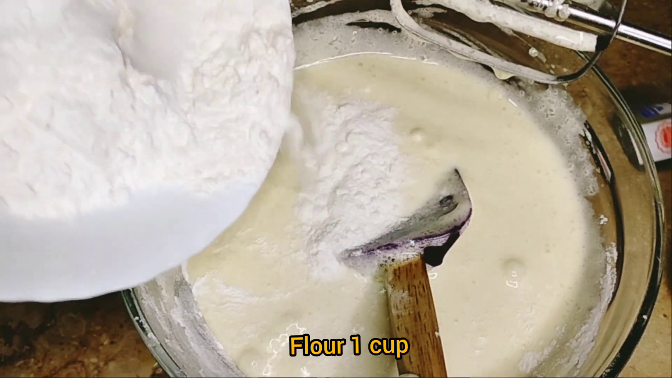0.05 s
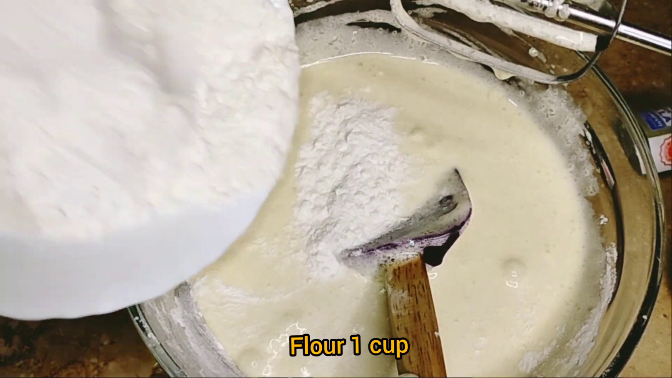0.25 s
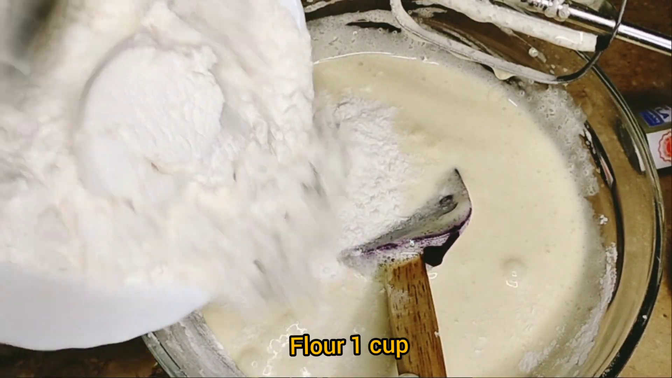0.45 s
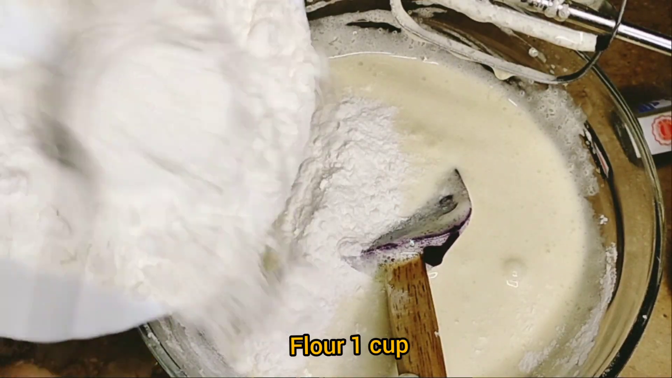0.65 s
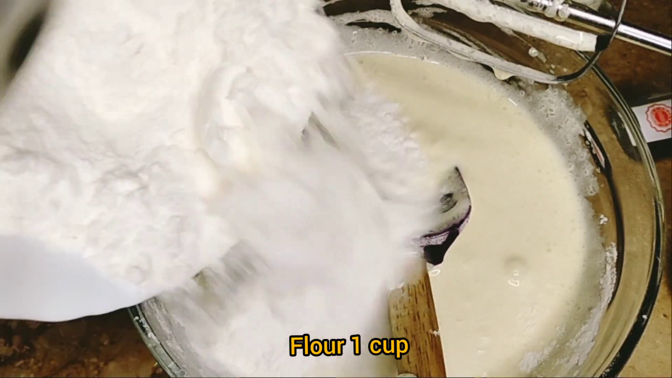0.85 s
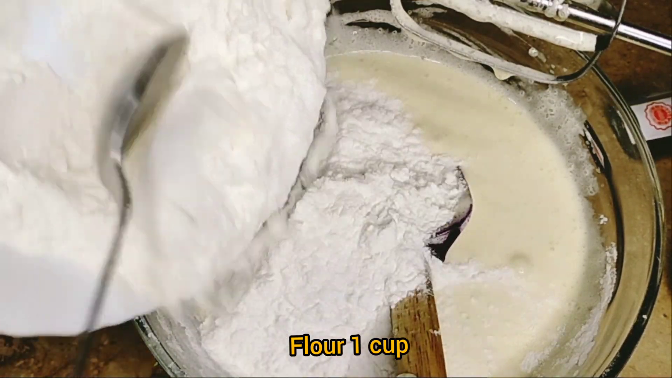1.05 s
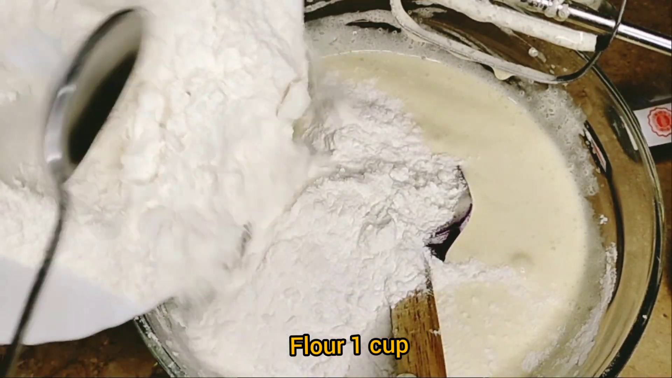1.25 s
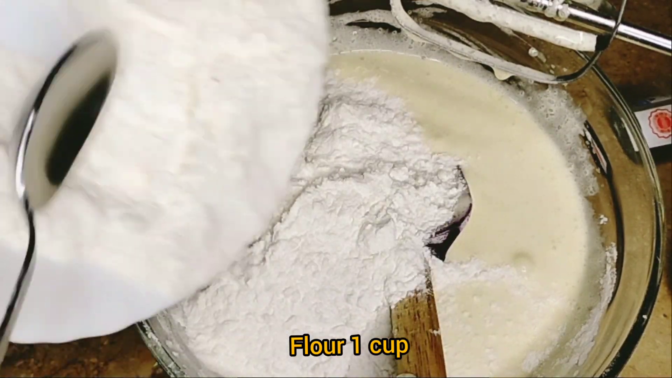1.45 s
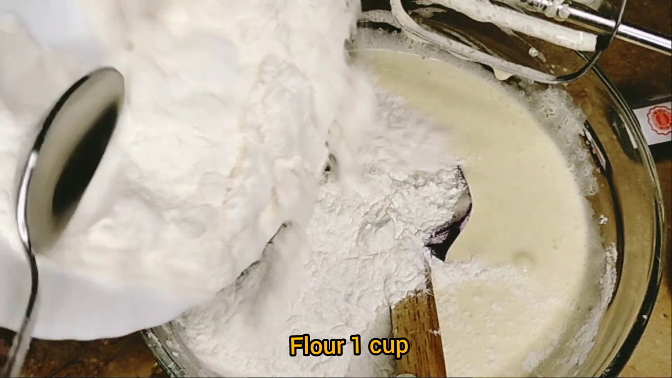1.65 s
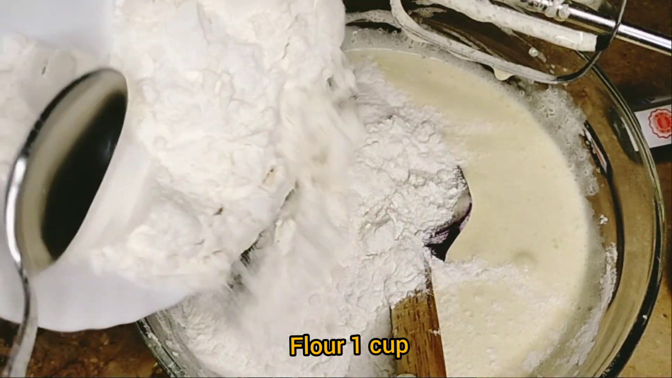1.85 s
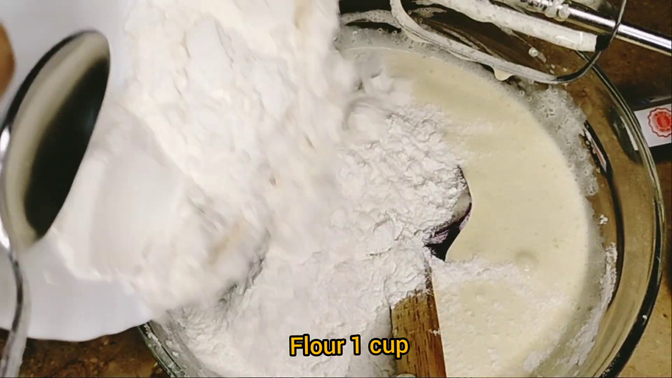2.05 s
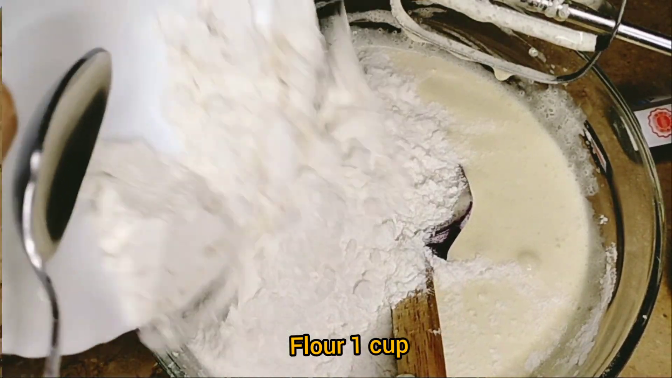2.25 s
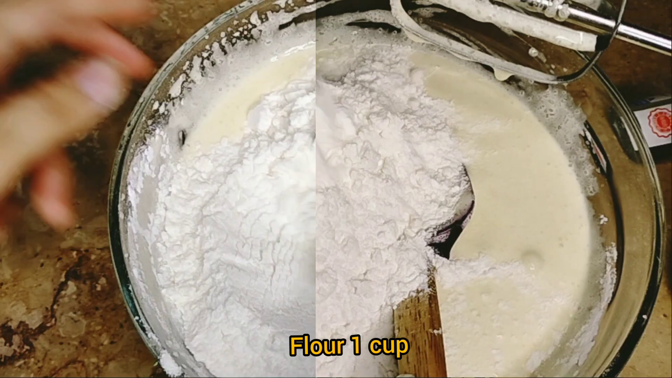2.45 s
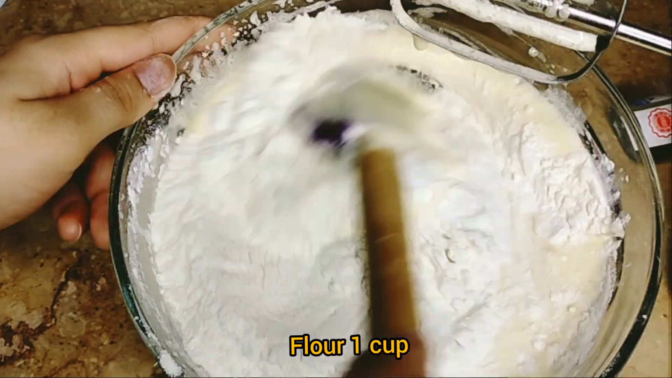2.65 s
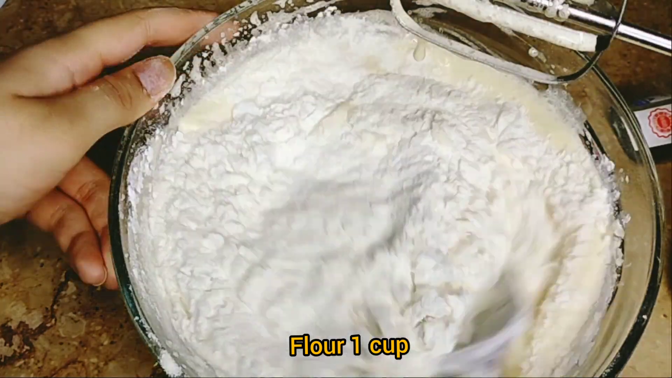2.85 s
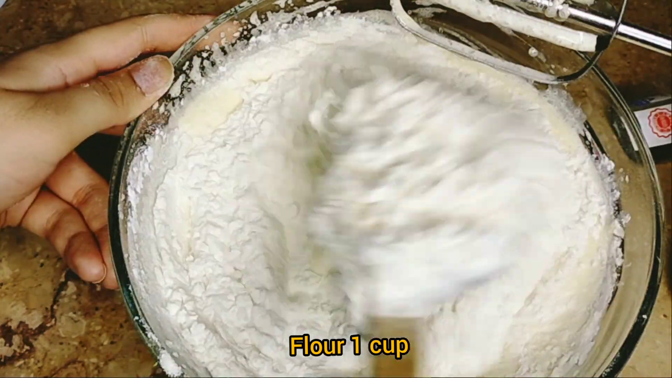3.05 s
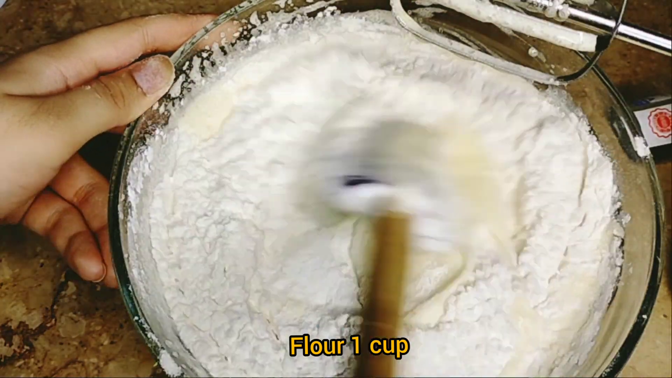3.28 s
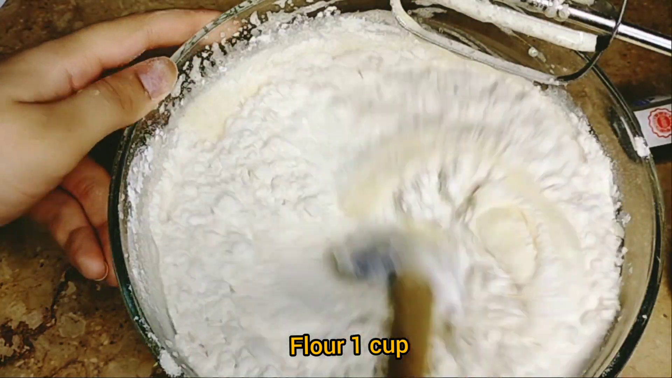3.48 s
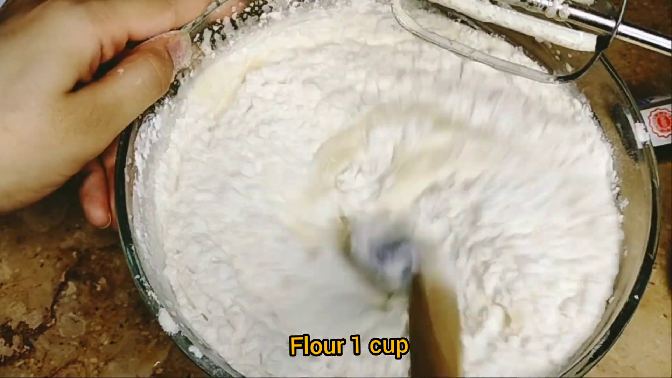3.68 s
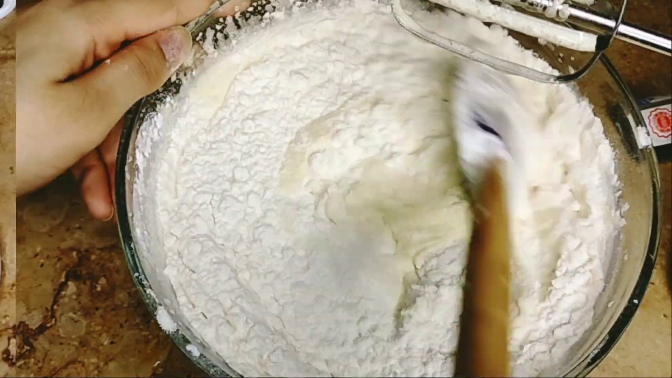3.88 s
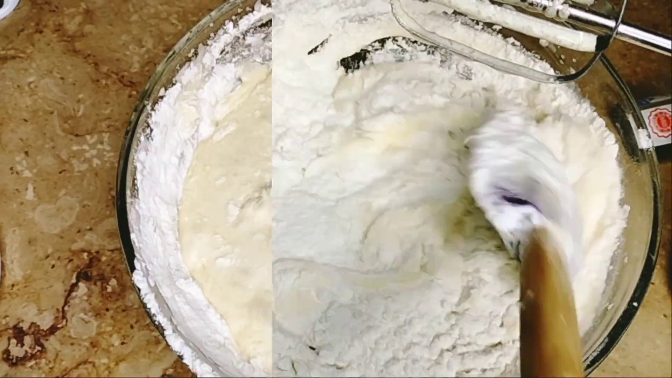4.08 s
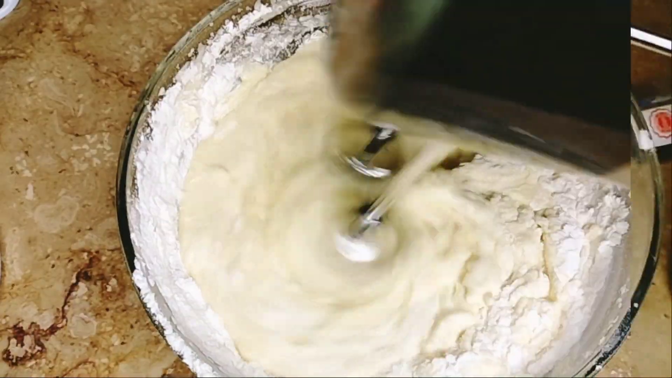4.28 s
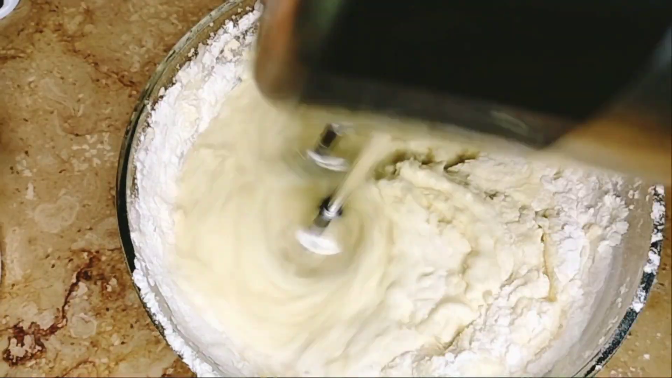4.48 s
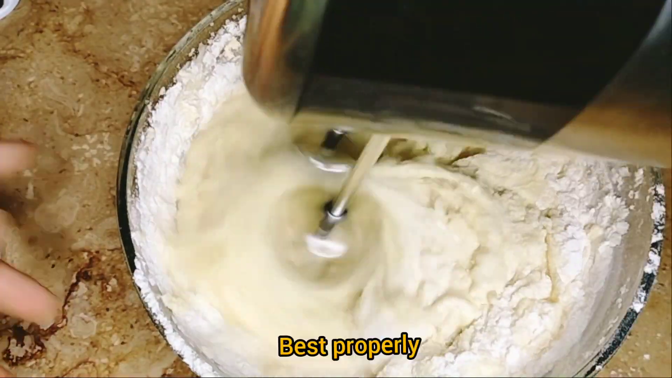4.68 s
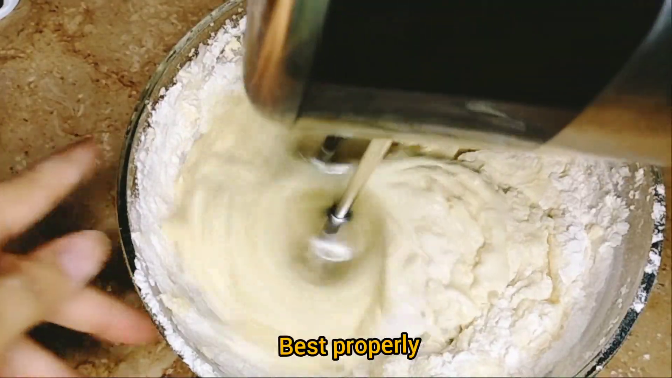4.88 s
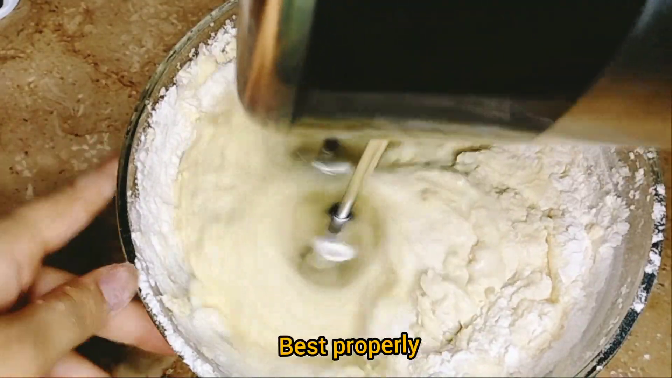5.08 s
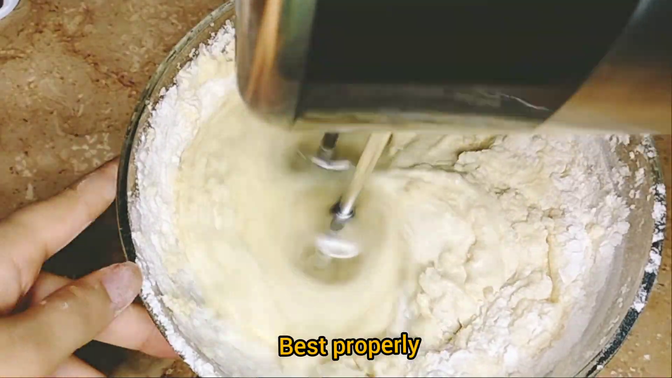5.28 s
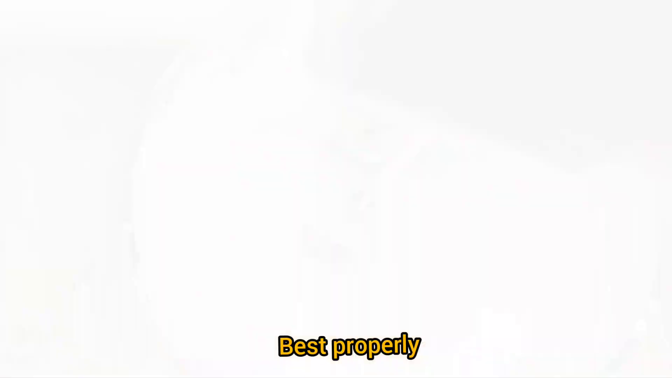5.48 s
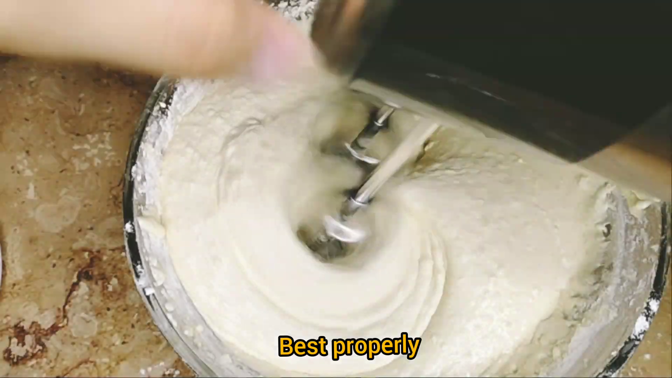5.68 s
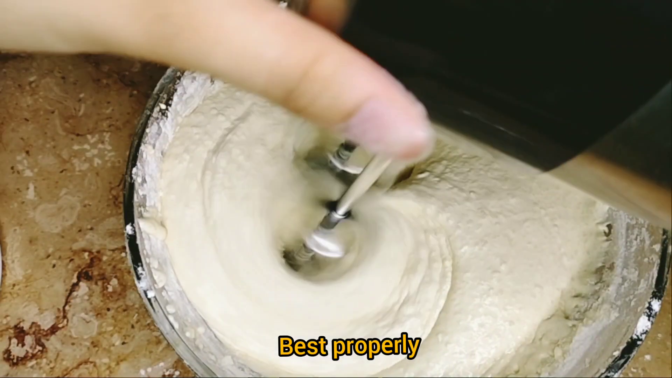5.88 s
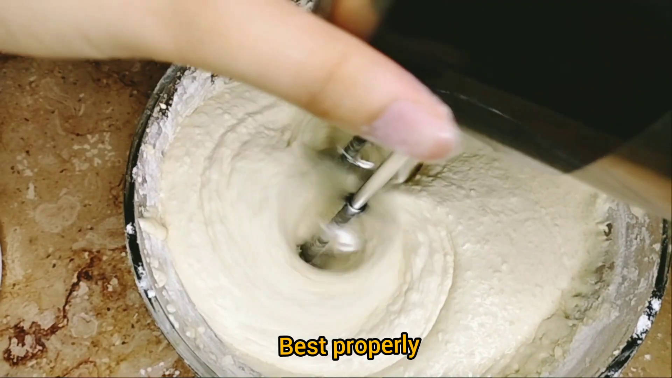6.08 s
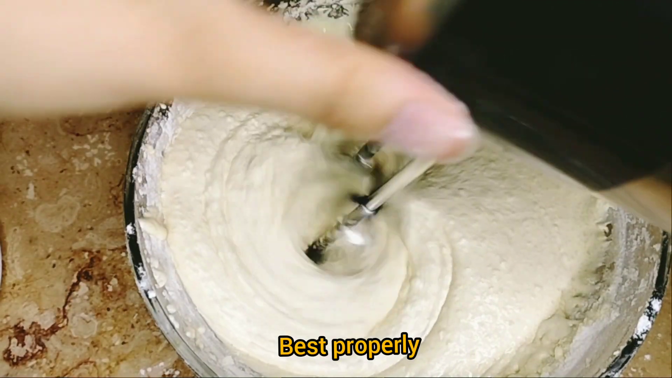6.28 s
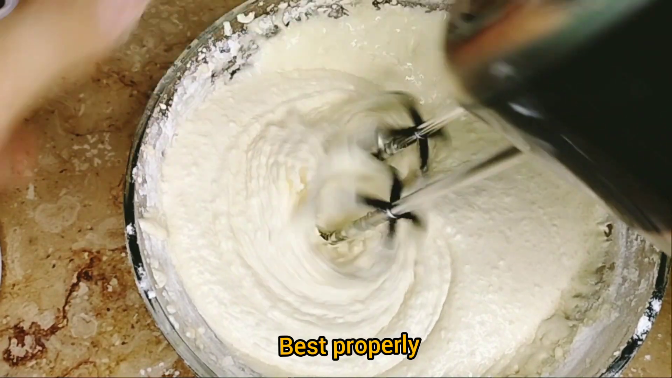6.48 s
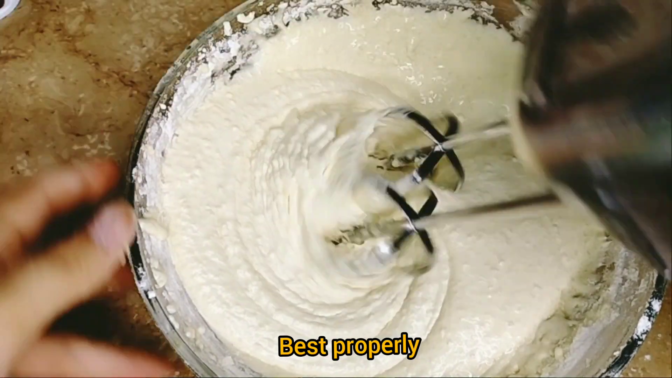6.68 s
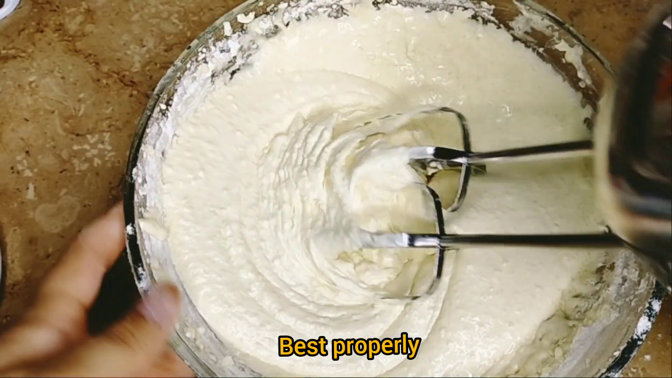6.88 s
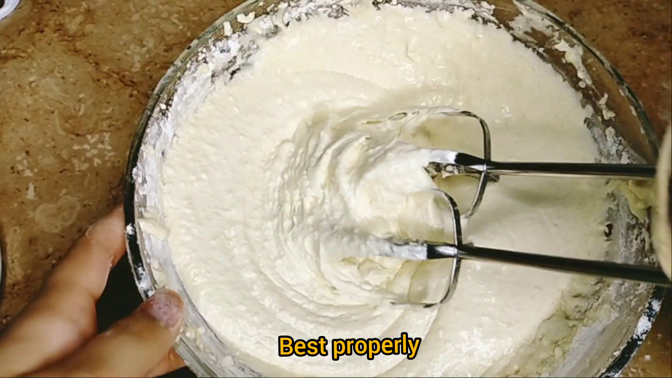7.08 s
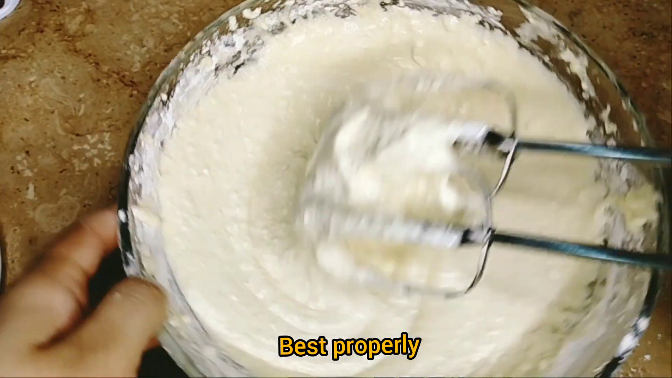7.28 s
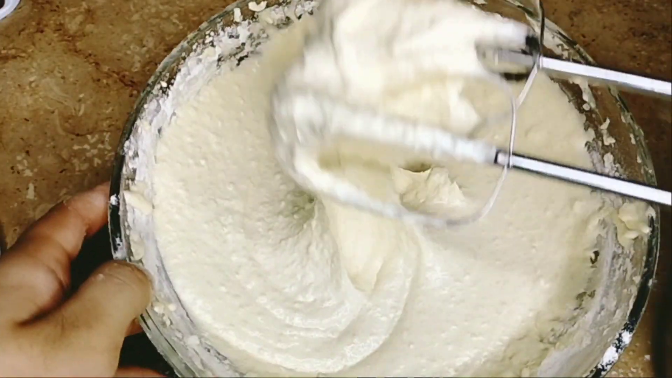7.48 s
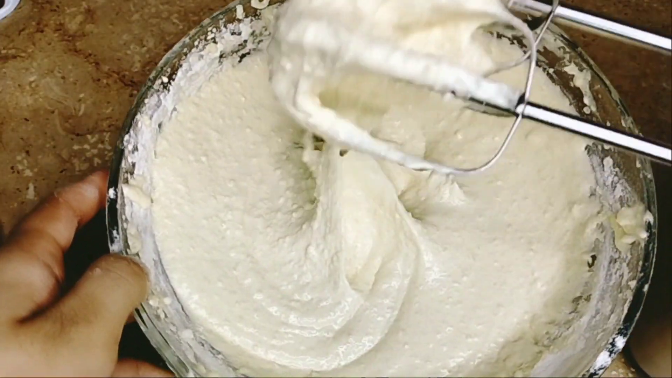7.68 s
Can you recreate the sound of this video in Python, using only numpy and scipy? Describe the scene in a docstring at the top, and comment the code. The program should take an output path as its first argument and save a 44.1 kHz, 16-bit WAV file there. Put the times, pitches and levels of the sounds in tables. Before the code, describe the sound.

Right at the start, a dish hits the rim of a glass bowl with a bright, ringing double clank. A spoon taps lightly at about 0.5, 0.9, 1.3 and 2.1 seconds, among very faint swishes of flour. Dull knocks come near 1.9 and 2.8 seconds, with barely audible squelches of stirred batter. At 3.8 seconds an electric hand mixer starts, whining quickly upward into a loud, buzzing, rattling whir. From about 4.6 seconds its beaters click irregularly against the glass. The whole sound fades to silence for an instant at 5.5 seconds and returns as the motor switches off, falling in pitch until it stops around 6.8 seconds. At 7 seconds the mixer bumps the bowl with a low ring. A soft knock and quiet wet squelches follow until about 7.7 seconds as the beaters pull out. Everything sounds close, in a small, quiet kitchen with slight reverberation.

```python
"""A small kitchen: flour is spooned from a dish into a glass bowl of batter and stirred in.
Dish and spoon clink and ring, the flour swishes, the batter squelches. An electric hand mixer runs up:
its gears rattle, its rotor slots whine, its beaters strike the glass. The sound fades out and back in.
The motor is switched off and coasts down, the mixer bumps the bowl, the beaters pull out of the batter."""
import sys
import numpy as np
from scipy import signal
from scipy.fft import rfft, irfft
from scipy.io import wavfile

SR = 44100
rng = np.random.default_rng(int(sys.argv[2]) if len(sys.argv) > 2 else 0)


def master_out(mix):
    """Clip the mix to full scale and print it as 16-bit PCM to the path in sys.argv[1]."""
    frames = np.transpose(np.atleast_2d(mix))
    ceiling = np.clip(frames, -1, 1)
    pcm = np.round(ceiling * 32767).astype(np.int16)
    wavfile.write(sys.argv[1], SR, pcm)


N = 340893
TIME = np.arange(N) / SR

POWER_ON_S, POWER_OFF_S = 3.8, 5.69
FADE_AT_S, FADE_SLOPE_S = 5.503, .29
TOP_SPEED_HZ, SURGE_HZ = 290.3, 99.5   # rotor turns, mains half waves
GEAR_DB, GEAR_DB_PER_OCTAVE = -27.5, 10

# Batter load on the beaters. Each row: time in seconds, gain in dB.
BATTER_LOAD = [(3.82, -11), (3.95, -9), (4.12, -5.5), (4.64, 1), (5.2, 0), (5.62, -3), (6.13, -4),
               (6.5, 0.5)]


def mixer(speed_hz, room):
    """Rotor speed sets the rotor tones; speed and load set the level of rattle, hum and fan hiss."""
    # Each row: multiple of the turn rate, level in dB against the rattle at full speed.
    rotor_orders = [(2, -14.5), (3, -11.5), (4, -14.5), (5, -14), (6, -19.5), (7, -36), (8, -18), (9, -20),
                    (10, -19.5), (13, -42.5)]
    # Each row: frequency in Hz, relative level in dB.
    fan_spectrum = [(2650, -15), (4500, -1), (5400, -9.5), (6500, -11.5), (7650, -9), (8320, -0.5),
                    (8960, -3), (9740, -11.5), (12000, -20.5), (15800, -15)]
    # Each row: frequency in Hz, level in dB at half speed.
    stator_tones = [(100, -62.5), (200, -58.5)]
    angle_rad = 2 * np.pi * np.cumsum(speed_hz) / SR + 0.016 * drift(21)
    powered = during(POWER_ON_S, POWER_OFF_S)
    speed_share = speed_hz / speed_hz.max()
    gear_gain = from_db(driven_db(speed_hz, GEAR_DB, GEAR_DB_PER_OCTAVE))
    gears = gear_gain * gear_rattle(angle_rad, mesh_depth=0.11, rough_db=1.5, ring_db=4.0)
    rotor = sum(from_db(db + 2.3 * drift(6)) * np.sqrt(2) * np.sin(k * angle_rad + 0.62 * drift(6.6))
                for k, db in rotor_orders)
    rotor *= gear_gain * speed_share ** 2   # unbalance
    rotor *= 1 + 0.92 * powered * np.cos(2 * np.pi * SURGE_HZ * TIME)   # torque surges with the mains
    hum = from_db(driven_db(speed_hz, top_db=-30, db_per_octave=28)) * np.sin(angle_rad)
    fan_db = driven_db(speed_hz, top_db=-44, db_per_octave=9) + 2.0 * drift(60)
    fan = from_db(fan_db) * noise(fan_spectrum)
    stator = sum(from_db(db + 25 * (speed_share - 0.5) + 5.1 * drift(14)) * np.sin(2 * np.pi * hz * TIME)
                 for hz, db in stator_tones)
    whine = motor_whine(speed_hz, angle_rad, powered, room)
    return (gears + rotor + hum + whine + fan + powered * stator) * during(POWER_ON_S, 6.9)


def motor_speed_hz():
    """Run-up; after the fade a slower, slightly sagging run; then coasting against drag and friction."""
    kick_hz, run_up_s = 43, .284
    switch_off_hz, sag_hz_per_s = 244, 85
    drag_s, friction_hz_per_s = 1.2, 126
    since_on_s, since_off_s = np.maximum(TIME - POWER_ON_S, 0), TIME - POWER_OFF_S
    run_up = TOP_SPEED_HZ - (TOP_SPEED_HZ - kick_hz) * np.exp(-since_on_s / run_up_s)
    slower_run = switch_off_hz - sag_hz_per_s * since_off_s
    brake_hz = friction_hz_per_s * drag_s
    coast = (switch_off_hz + brake_hz) * np.exp(-since_off_s / drag_s) - brake_hz
    return np.maximum(np.select([TIME < FADE_AT_S, since_off_s < 0], [run_up, slower_run], coast), 1)


def driven_db(speed_hz, top_db, db_per_octave):
    """A mixer layer grows louder with speed and load."""
    return top_db + db_per_octave * np.log2(speed_hz / TOP_SPEED_HZ) + in_time(BATTER_LOAD)


def gear_rattle(angle_rad, mesh_depth, rough_db, ring_db):
    """Gear teeth clatter unevenly, swelling once a turn, and ring the shell."""
    # Each row: frequency in Hz, relative level in dB.
    gear_spectrum = [(35, -69), (60, -50.5), (97, -18), (250, -8), (286, -12), (321, -4.5), (519, -8),
                     (561, -4.5), (874, -3), (1680, -8), (1890, -9), (3120, -18), (3430, -18),
                     (3930, -19.5), (6000, -52.5), (7800, -64.5), (13200, -120)]
    # Each row: frequency in Hz, width in Hz, gain in dB.
    shell_modes = [(167.7, 33.5, -8), (909, 63, -5), (947, 11, 4), (1500, 38, 2), (1660, 89, 3),
                   (2670, 190, -5.5)]
    teeth = rng.standard_normal(N) * (1 + mesh_depth * np.cos(angle_rad)) * from_db(rough_db * drift(70))
    clatter = colour(teeth, gear_spectrum)
    shell = sum(from_db(db) * resonance(clatter, hz, width) for hz, width, db in shell_modes)
    return unit_rms(clatter + from_db(ring_db) * shell)


def motor_whine(speed_hz, angle_rad, powered, room):
    """Twelve rotor slots pass the poles; their tone sweeps the housing modes. Brushes and room add in."""
    # Each row: frequency in Hz, width in Hz, gain in dB.
    housing_modes = [(950, 270, -41.5), (1523, 320, -29), (2856, 266, -14), (3506, 250, -23.5)]
    inrush_end_hz, no_load_hz, slower_whine_db = 275, 334.4, -11.5
    slot_rad = 12 * angle_rad
    # Starting current adds overtones and sparks, which ring the casing.
    inrush = powered * np.clip(1 - speed_hz / inrush_end_hz, 0, 1)
    overtones = sum(surging_tone(k * slot_rad, wobble_rad=.5) * (2 / k) ** 4 for k in range(2, 6))
    sparks = from_db(16.5) * rng.standard_normal(N)
    casing = resonance(from_db(14) * overtones + sparks, hz=2690, width_hz=64)
    current = powered * np.clip(1 - speed_hz / no_load_hz, 0, 1)
    pull = current * from_db(slower_whine_db * (TIME > FADE_AT_S)) * surging_tone(slot_rad, wobble_rad=.2)
    whine = sum(from_db(db) * resonance(pull, hz, width) for hz, width, db in housing_modes)
    whine += from_db(-50.5) * inrush * (overtones + casing)
    whine += brushes(speed_hz, angle_rad, powered)
    return from_db(-1) * whine + from_db(-9) * signal.fftconvolve(whine, room)[:N]


def brushes(speed_hz, angle_rad, powered):
    """Worn brushes buzz under power; coasting, they give one uneven tone of the commutator bars."""
    # Each row: multiple of the turn rate, relative level in dB.
    brush_orders = [(21, -5), (23, -1), (24, -3), (25, -5)]
    # Each row: frequency in Hz, gain in dB.
    shell_radiation = [(900, -76), (1500, -56), (2500, -54), (3300, -56), (4000, -63), (5200, -60),
                       (6900, -57)]
    bars = 24
    buzz = sum(from_db(db) * surging_tone(k * angle_rad, wobble_rad=.2) for k, db in brush_orders)
    buzz *= (speed_hz / speed_hz.max()) ** 2
    coasting = from_db(1 + 5 * drift(14)) * np.sin(bars * angle_rad + .25 * drift(90))
    return from_db(at_hz(shell_radiation, bars * speed_hz)) * (powered * buzz + (1 - powered) * coasting)


def surging_tone(phase_rad, wobble_rad):
    """The pull surges with each mains half wave, splitting a motor tone into a cluster of lines."""
    # Each row: offset in multiples of the surge rate, relative level in dB.
    sidebands = [(-1, -9), (0, 0), (1, 0), (2, -10)]
    surge_rad = 2 * np.pi * SURGE_HZ * TIME
    phase_rad = phase_rad + wobble_rad * drift(40)
    return unit_rms(sum(from_db(db) * np.sin(phase_rad + step * surge_rad) for step, db in sidebands))


def beaters(speed_hz, room):
    """Wires strike the glass; random light grazes come oftener and harder with speed and load."""
    # Each row: start in seconds, relative level in dB.
    hard_strikes = [(4.597, -19.5), (4.615, -21.5), (4.859, -16.5), (5.214, -18.5), (5.325, -16.5),
                    (5.669, -20.5), (5.755, -23), (5.973, -21), (6.038, -29.5), (6.116, -22.5)]
    # Each row: frequency in Hz, relative level in dB.
    spectrum = [(50, -35.5), (110, -2), (165, 11), (250, 4), (500, 2.5), (900, 4.5), (1400, 12), (1800, -4),
                (2800, -50.5), (4200, -30.5), (6800, -30.5), (8600, -39), (11000, -66.5), (15000, -43)]
    # Wires and full bowl. Each row: frequency in Hz, relative level in dB, T60 in seconds.
    modes = [(169, -13, 0.14), (1030, -2.5, 0.072), (1407, 4, 0.035)]
    grazes_per_s, room_db = 9, -5
    running = (TIME > POWER_ON_S) * (speed_hz > 1)
    effort = np.sqrt(speed_hz / TOP_SPEED_HZ) * from_db(in_time(BATTER_LOAD)) ** 2 * running
    graze_db = driven_db(speed_hz, GEAR_DB, GEAR_DB_PER_OCTAVE) + rng.normal(3, 3, N)
    grazes = [(TIME[i], graze_db[i]) for i in np.flatnonzero(rng.random(N) < grazes_per_s * effort / SR)]
    hits = [(s, db, 0, 0, room_db) for s, db in [*hard_strikes, *grazes]]
    return blows(hits, spectrum, room, gain_db=16.5, chatter_s=.003, chatter_db=0.5,
                 modes=modes, ring_db=-24)


def dish_clanks(room):
    """The dish hits the bowl's rim and rings."""
    # Each row: start in seconds, then relative level, bass, treble and room send in dB.
    hits = [(0.0915, -10, 2, -4, -6), (0.1935, -22.5, 3, -27, -5), (0.232, -40, -4, 18, -6),
            (0.421, -48, -11, 0, -15)]
    # Each row: frequency in Hz, relative level in dB.
    spectrum = [(47, -38), (80, -26), (154, -5), (229, -16.5), (347, -12.5), (413, -13), (1110, 2.5),
                (1290, -8.5), (1640, 5), (2380, -7.5), (2600, -4.5), (3610, -19.5), (4030, -2), (4500, -27),
                (15000, -56)]
    # Each row: frequency in Hz, relative level in dB, T60 in seconds.
    rim_modes = [(157, -9, 0.15), (959, -17, 0.48), (1600, -15, .4), (1914, -6.5, 0.41),
                 (2530, -15.5, 0.89), (4030, -4, 0.51), (4005, 11.5, 0.038), (8520, -14.5, 0.094)]
    return blows(hits, spectrum, room, gain_db=13.5, chatter_s=0.012, chatter_db=3.0,
                 modes=rim_modes, ring_db=-36)


def mixer_bump(room):
    """The mixer bumps the bowl, which rings low."""
    # Each row: start in seconds, then relative level, bass, treble and room send in dB.
    hits = [(6.976, -15.5, -1, 0, -10.5)]
    # Each row: frequency in Hz, relative level in dB.
    spectrum = [(35, -69), (60, -19), (184, -8), (478, -14), (537, -11.5), (711, -21), (962, -7),
                (1060, -9), (2030, -17.5), (2280, -23), (5400, -34.5), (8620, -38), (15800, -45)]
    # Each row: frequency in Hz, relative level in dB, T60 in seconds.
    bowl_modes = [(164.4, -3, 0.39), (175, -1.5, 0.75), (205, 3.5, 0.47), (960, -24, 0.14),
                  (1500, -22, .35)]
    return blows(hits, spectrum, room, gain_db=12.5, chatter_s=0.0066, chatter_db=7.5,
                 modes=bowl_modes, ring_db=-30)


def spoon_taps(room):
    """The spoon taps the dish and rings briefly."""
    # Each row: start in seconds, then relative level, bass, treble and room send in dB.
    hits = [(0.539, -36.5, 4.5, -5, -4), (0.865, -43, 10.5, -2.5, -5.5), (1.262, -33.5, 3, -14, -3.5),
            (2.098, -32, -18, -27, -7.5)]
    # Each row: frequency in Hz, relative level in dB.
    spectrum = [(60, -66), (150, -22.5), (270, -21), (780, -7), (1630, -7.5), (2400, -17.5), (3320, -18.5),
                (4090, -12), (4940, -25), (5850, -16), (6910, -37.5), (8700, -7.5), (11000, -41),
                (15000, -35)]
    # Each row: frequency in Hz, relative level in dB, T60 in seconds.
    spoon_modes = [(825, 9, 0.23), (1546, -2.5, 0.062), (2830, 12, 0.06), (4030, 1, .2), (6080, -20, 0.25),
                   (8560, -22, .25)]
    return blows(hits, spectrum, room, gain_db=15.5, chatter_s=0.0037, chatter_db=8.0,
                 modes=spoon_modes, ring_db=-37.5)


def bowl_knocks(room):
    """Dull knocks on the bowl, without ring."""
    # Each row: start in seconds, then relative level, bass, treble and room send in dB.
    hits = [(1.890, -34.5, -30, -10, -12), (2.835, -42.5, -1.5, -12, -6), (2.840, -27.5, -6, -15, -33),
            (3.555, -46, -21, 4.5, -3.5), (7.241, -38, 0, -4, -1.5), (7.249, -38, 3, -37, -13)]
    # Each row: frequency in Hz, relative level in dB.
    spectrum = [(35, -18), (60, -11), (149, 0), (1430, -3.5), (1600, -15), (2180, -31), (2490, -27),
                (3240, -39), (4050, -21.5), (5050, -49.5), (6890, -36), (9000, -24.5), (12000, -61),
                (15600, -59), (22000, -120)]
    return blows(hits, spectrum, room, gain_db=17.5, chatter_s=0.0041, chatter_db=0.5)


def blows(hits, spectrum, room, gain_db, chatter_s, chatter_db, modes=(), ring_db=0):
    """Each blow is a click with brief chatter; it excites the modes and the room."""
    out, t = np.zeros(N + SR), TIME[:SR]
    for start_s, level_db, bass_db, treble_db, room_db in hits:
        chatter = unit_rms(rng.standard_normal(SR) * np.exp(-t / chatter_s))
        contact = chatter * from_db(chatter_db) / np.sqrt(SR)
        contact[0] += 1   # the click
        hit = colour(contact, spectrum)
        for hz, mode_db, t60_s in modes:
            # A round dish has close mode pairs, which beat.
            pair = sum(share * np.sin(2 * np.pi * hz * rng.normal(1, .005) * t) for share in (.7, .4))
            decay = from_db(ring_db + mode_db + rng.normal(0, 2) - 60 * t / t60_s)
            hit += decay * pair * rng.choice([-1, 1])
        hit += from_db(room_db) * signal.fftconvolve(hit, room)[:SR]
        # Where and how hard it lands tips bass against treble.
        hit = colour(hit, [(300, bass_db), (700, 0), (3000, 0), (7000, treble_db)])
        hit *= np.sqrt(.25 + .75 * from_db(2 * treble_db))
        start = int(start_s * SR)
        out[start:start + SR] += from_db(level_db + gain_db) * hit
    return out[:N]


def batter(gain_db=4.5, bursts_per_s=2500, spread_db=2.5, ring_db=2, attack_share=0.37):
    """Spatula and rising beaters tear the batter: films and bubbles burst, the wet wires ring along."""
    # Each row: peak time in seconds, relative level in dB, release in seconds.
    squelches = [(2.674, -72, 0.023), (2.863, -59, 0.028), (3.56, -72, 0.037), (7.05, -62.5, 0.12),
                 (7.359, -56, 0.11), (7.476, -51, 0.056), (7.72, -64.5, 0.022)]
    # Each row: frequency in Hz, relative level in dB.
    spectrum = [(88, -37), (150, 5), (340, -25), (464, -2), (587, -46), (686, -2.5), (1280, -7.5),
                (1440, -2), (2250, -9), (4120, -5.5), (5200, -18), (7390, -18.5), (9340, -7.5),
                (10700, -25.5), (15800, -18)]
    # Each row: frequency in Hz, width in Hz.
    wire_modes = [(1500, 150), (4200, 72), (9400, 57)]
    bursts = (rng.random(N) < bursts_per_s / SR) * rng.standard_normal(N)
    tearing = colour(bursts * from_db(spread_db * rng.standard_normal(N)), spectrum)
    wires = from_db(ring_db) * sum(resonance(tearing, hz, width) for hz, width in wire_modes)
    swell = sum(from_db(db) * np.exp(-np.maximum(TIME - s, (s - TIME) / attack_share) / release_s)
                for s, db, release_s in squelches)
    return from_db(gain_db) * swell * unit_rms(tearing + wires)


def flour():
    """Dry flour slides in short, soft swishes."""
    # Each row: peak time in seconds, length in seconds, level in dB.
    swishes = [(0.765, 0.2, -67), (1.847, 0.21, -65.5), (2.52, 0.011, -68.5), (2.99, 0.035, -66),
               (3.47, 0.034, -67.5)]
    swell = sum(from_db(db) * np.exp(-2 * ((TIME - s) / length_s) ** 2) for s, length_s, db in swishes)
    return swell * unit_rms(band(rng.standard_normal(N), hz=(2460, 3640), kind="band"))


def kitchen_tail():
    """Unit-energy room response: dense echoes that die sooner in the treble."""
    # Each row: frequency in Hz, T60 in seconds.
    decay_times = [(150, 0.71), (600, 0.66), (2000, 0.47), (4000, 0.46), (9000, 0.37), (15000, 0.083)]
    t, edges_hz = TIME[:SR], np.geomspace(60, 17000, 10)
    tail = np.zeros(SR)
    for band_hz in zip(edges_hz, edges_hz[1:]):
        t60_s = at_hz(decay_times, np.sqrt(np.prod(band_hz)))
        tail += band(rng.standard_normal(SR), band_hz, "band") * from_db(-60 * t / t60_s)
    tail *= np.minimum(t / 0.002, 1)
    return tail / np.linalg.norm(tail)


def room_tone(level_db=-66):
    """Faint, steady background noise."""
    # Each row: frequency in Hz, relative level in dB.
    spectrum = [(24, -62.5), (40, -52), (91, -9), (130, -18), (219, -17), (261, -19), (431, -15.5),
                (513, -20), (611, -6.5), (693, -18), (1750, -19.5), (2360, -27.5), (3110, -26.5),
                (4760, -37), (15800, -44.5)]
    return from_db(level_db) * noise(spectrum)


def from_db(db):
    return 10 ** (np.asarray(db) / 20)


def unit_rms(x):
    return x / np.sqrt(np.mean(x ** 2) + 1e-20)


def in_time(points):
    return np.interp(TIME, *np.transpose(points))


def during(start_s, end_s, edge_s=.015):
    return np.clip(np.minimum(TIME - start_s, end_s - TIME) / edge_s, 0, 1)


def at_hz(points, hz):
    knots_hz, values = np.transpose(points)
    return np.interp(np.log(np.maximum(hz, 1)), np.log(knots_hz), values)


def band(x, hz, kind):
    return signal.sosfilt(signal.butter(2, hz, kind, fs=SR, output="sos"), x)


def drift(rate_hz):
    """Random wander with a spread near 1."""
    knots = rng.standard_normal(N // 20)
    return np.interp(TIME * 2 * rate_hz, np.arange(len(knots)), knots)


def colour(x, spectrum, size=8192):
    """Minimum-phase filter of unit energy."""
    bins_hz = np.arange(size // 2 + 1) * SR / size
    cepstrum = irfft(np.log(from_db(at_hz(spectrum, bins_hz))))
    response = irfft(np.exp(rfft(2 * cepstrum[:size // 2], size)))
    return signal.fftconvolve(x, response / np.linalg.norm(response))[:len(x)]


def noise(spectrum):
    return colour(rng.standard_normal(N), spectrum)


def resonance(x, hz, width_hz):
    radius = np.exp(-np.pi * width_hz / SR)
    feedback = [1, -2 * radius * np.cos(2 * np.pi * hz / SR), radius ** 2]
    return signal.lfilter(np.array([1, 0, -1]) * (1 - radius ** 2) / 2, feedback, x)


def scene():
    """Dish, spoon, bowl, batter and mixer in one kitchen; mono."""
    room, speed_hz = kitchen_tail(), motor_speed_hz()
    impacts = dish_clanks(room) + spoon_taps(room) + bowl_knocks(room) + mixer_bump(room)
    soft_layers = batter() + flour() + room_tone()
    return (mixer(speed_hz, room) + beaters(speed_hz, room) + impacts + soft_layers)[None]


def record(dry, low_cut_hz=55, high_cut_hz=15900):
    """Microphone bass roll-off, a brief fade out and in, then a steep high cut."""
    fade = np.minimum(np.abs(TIME - FADE_AT_S) / FADE_SLOPE_S, 1)
    high_cut = signal.ellip(12, .1, 80, high_cut_hz, fs=SR, output="sos")
    return signal.sosfilt(high_cut, band(dry, low_cut_hz, "high") * fade)


dry = scene()
out = record(dry)
master_out(out)
```